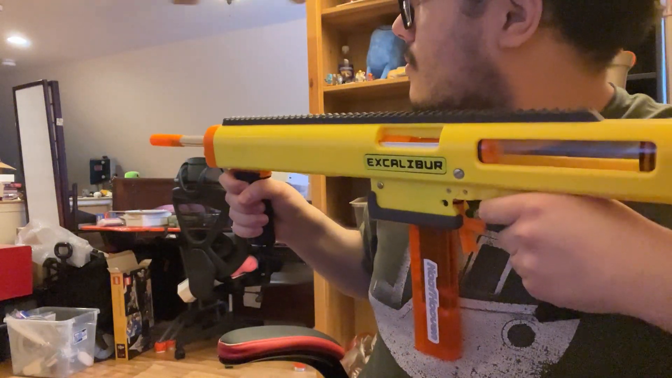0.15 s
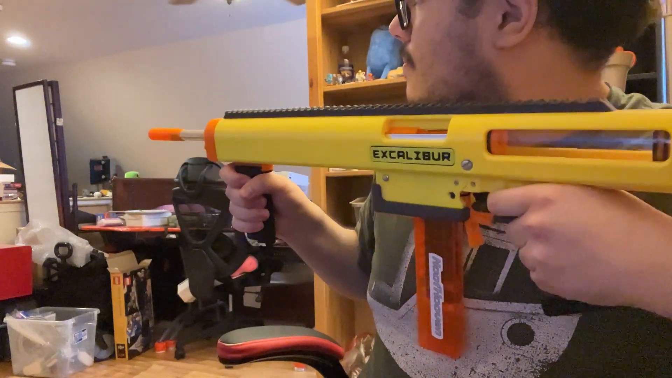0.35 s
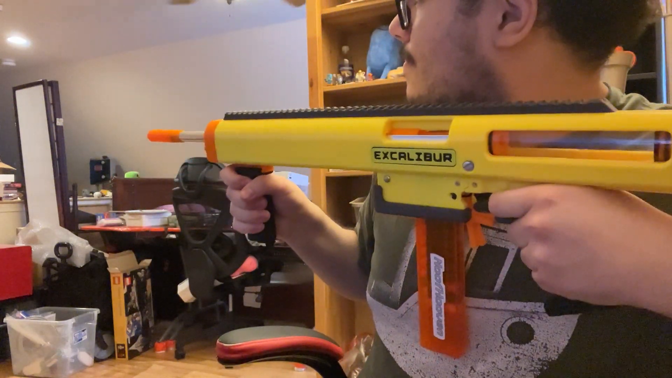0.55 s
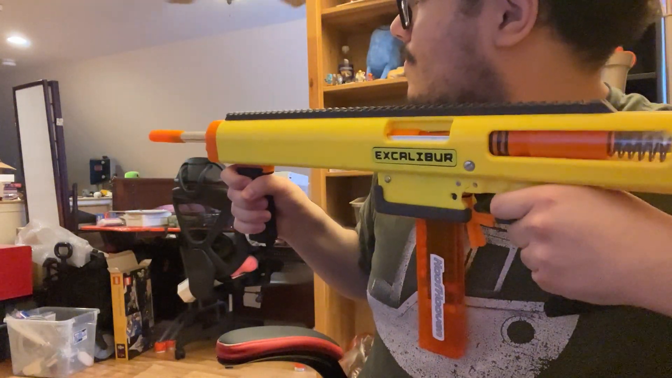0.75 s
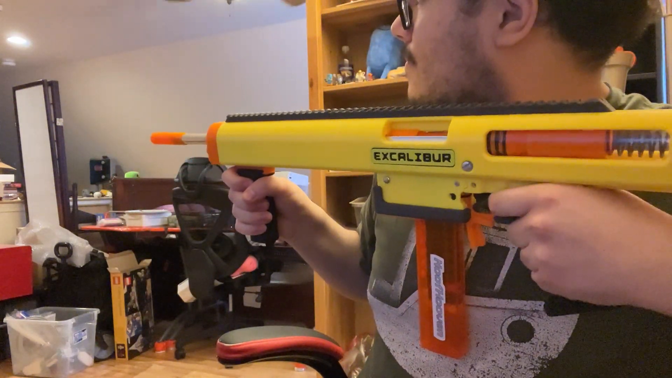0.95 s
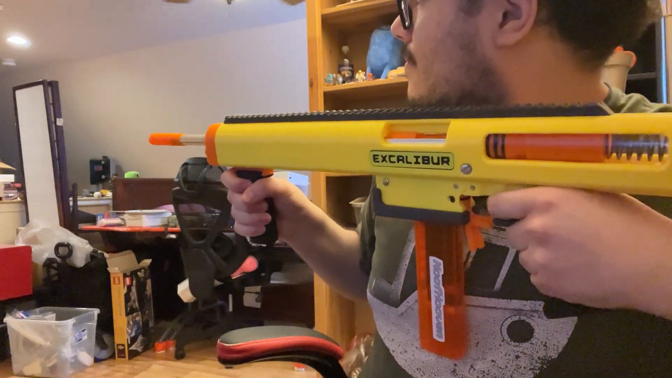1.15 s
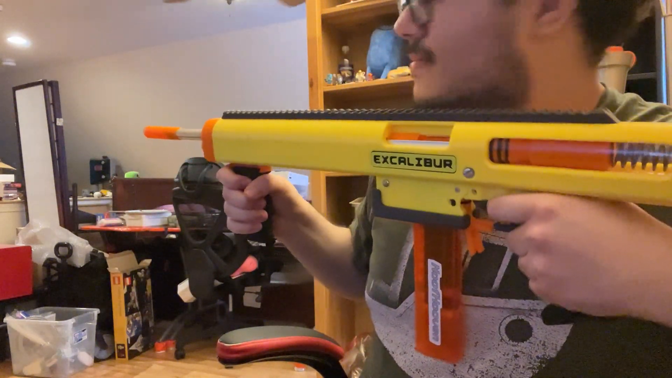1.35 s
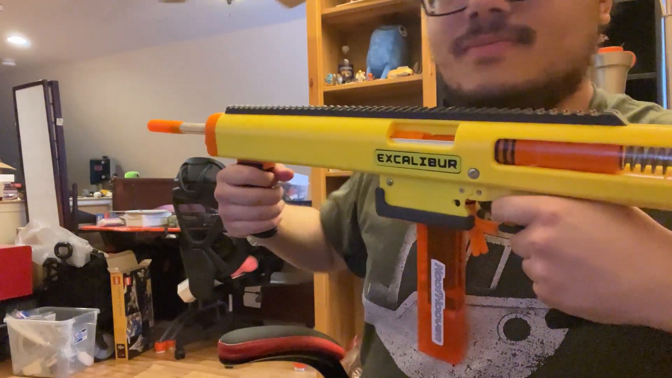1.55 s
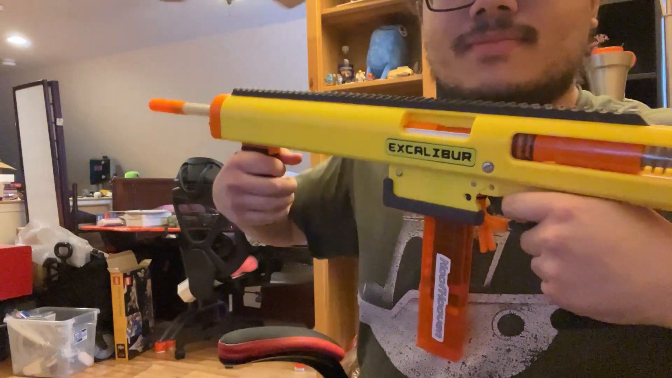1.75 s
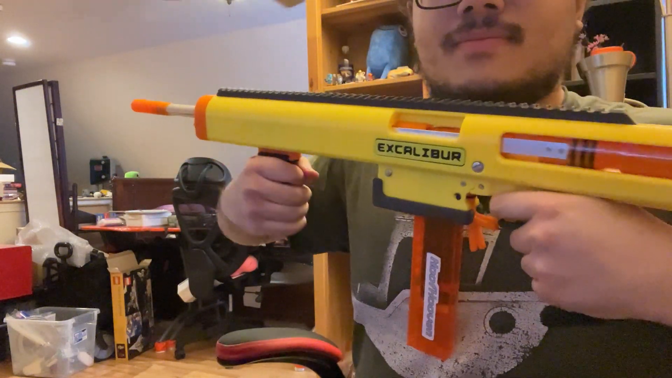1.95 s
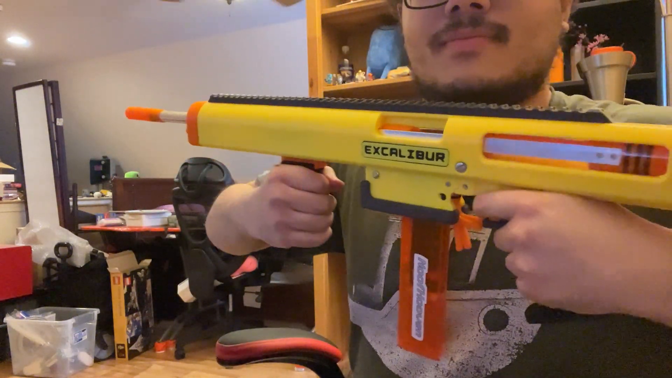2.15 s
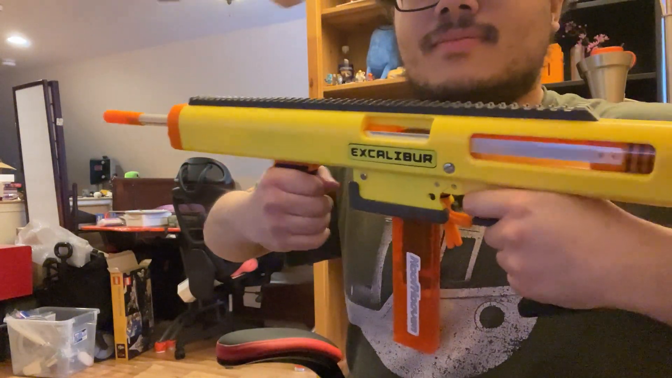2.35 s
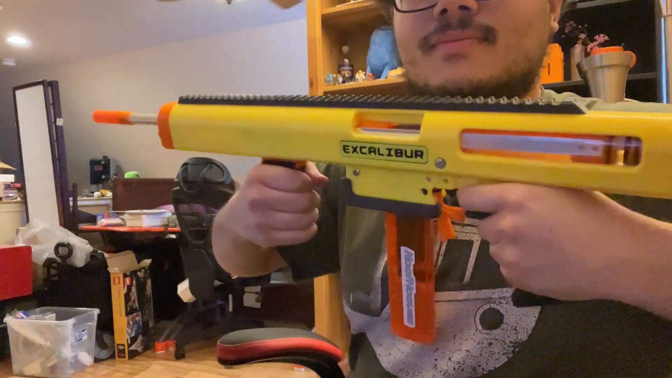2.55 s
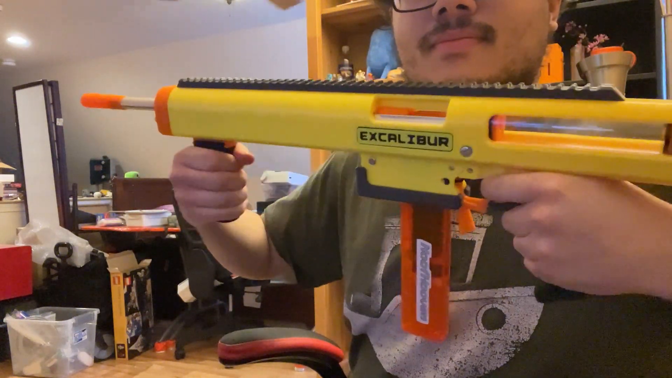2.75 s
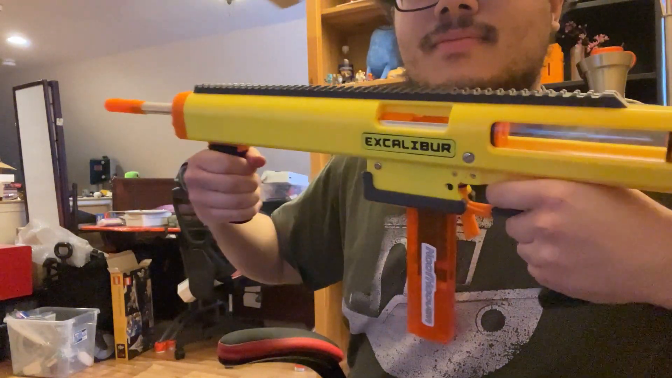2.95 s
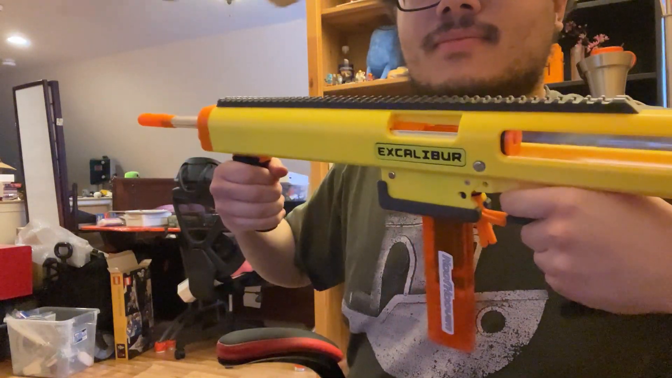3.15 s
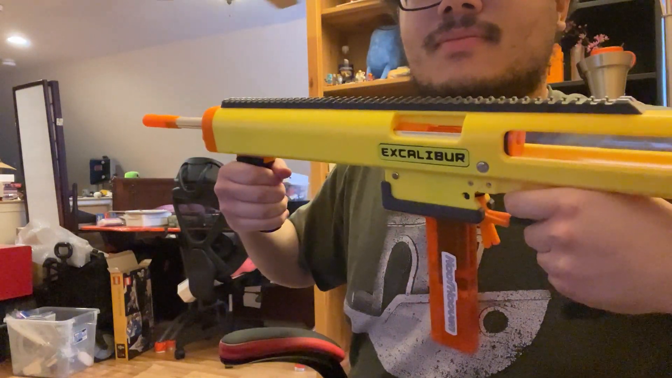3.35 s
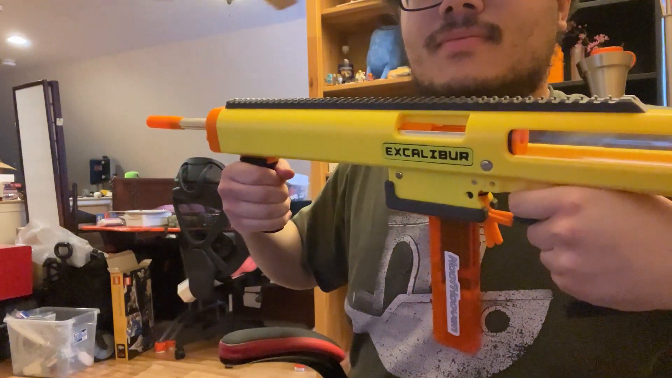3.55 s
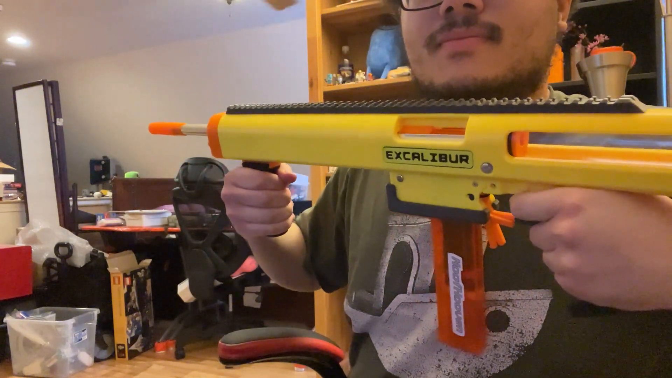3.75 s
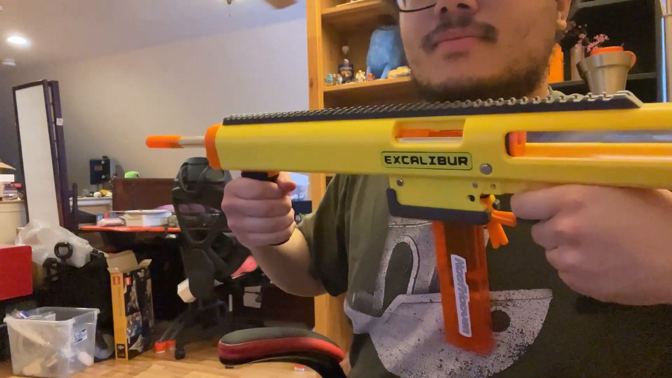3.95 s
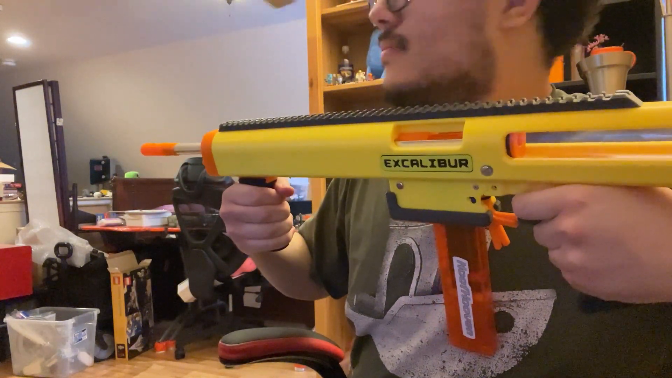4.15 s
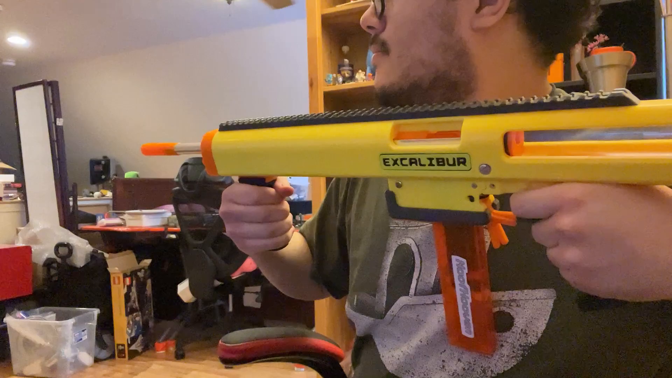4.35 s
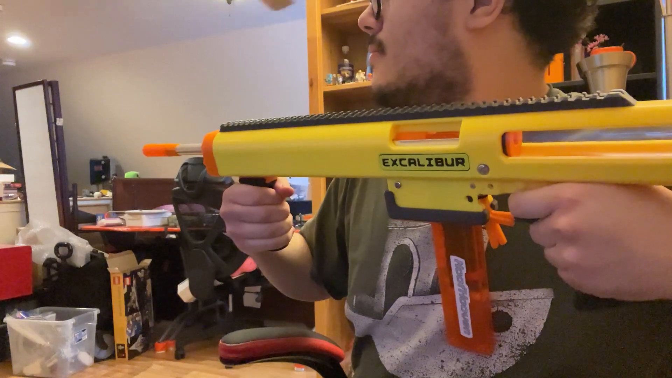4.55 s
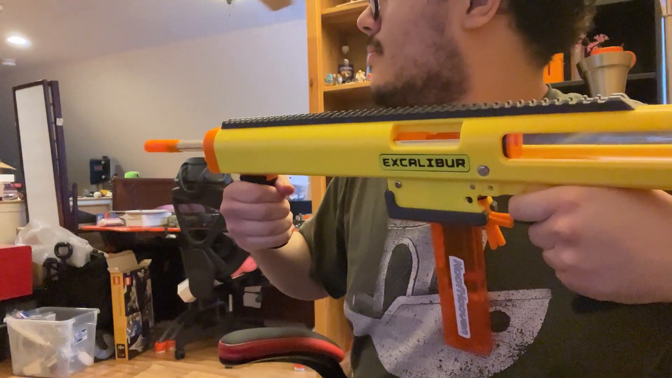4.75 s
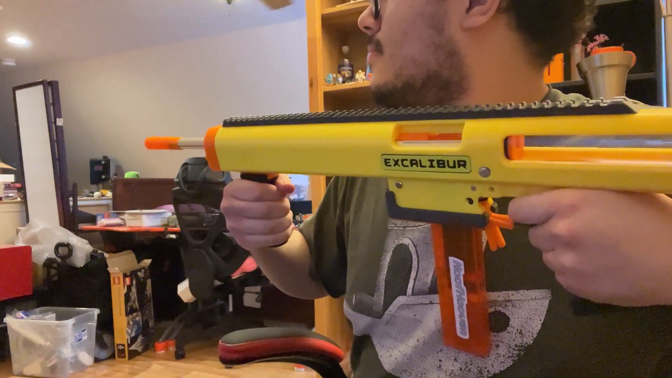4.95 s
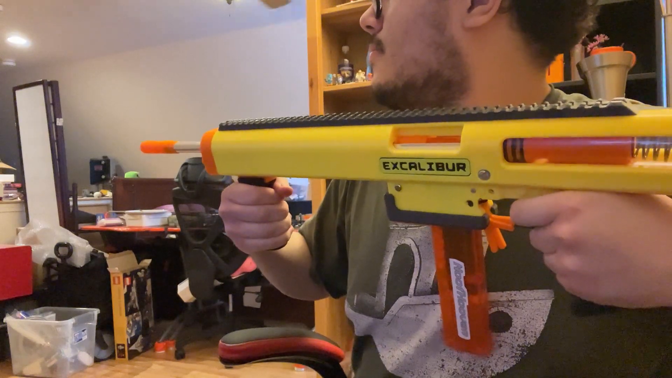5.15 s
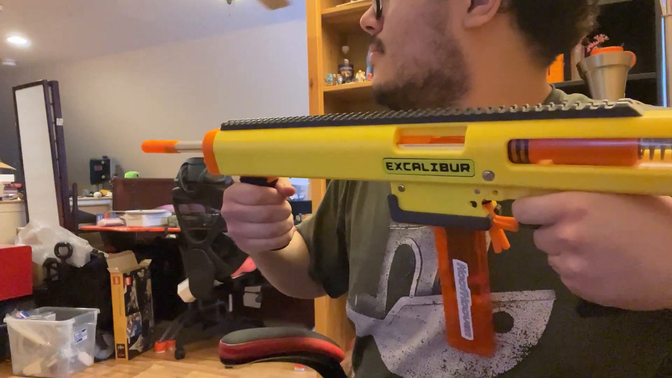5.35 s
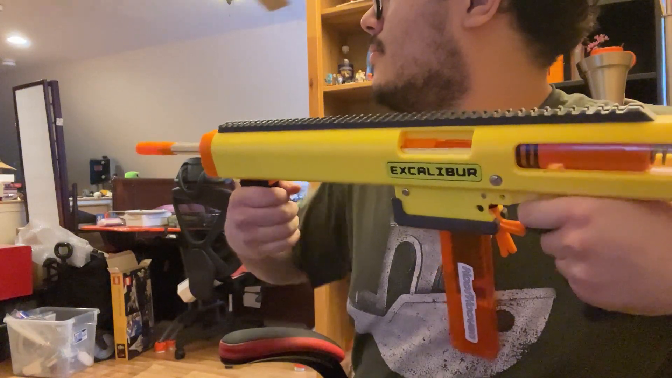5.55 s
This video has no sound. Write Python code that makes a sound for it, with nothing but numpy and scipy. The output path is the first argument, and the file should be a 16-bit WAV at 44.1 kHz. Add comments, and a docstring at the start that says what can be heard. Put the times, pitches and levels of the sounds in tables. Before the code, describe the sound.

A faint fan-like appliance hum fills a small, cluttered room throughout, with occasional deep handling rumble. Close by, a plastic blaster's trigger clicks at about 0.55 s; at 0.65 s the plunger slides and slams home in a loud, hollow double clack with a low air pop. Shell and spring ring thinly. At 0.88 s the dart smacks a far wall with plenty of room sound. Around 1.4 s a spent dart patters softly on the floor. From 1.75 s the pump knocks, then rattles and scrapes loudly at 2.05-2.25 s, reaching a softer stop at 2.38 s. A hissier forward slide at 2.63 s ends in a sharp clack at 2.78 s with a faint twang. Mostly hum remains until a small click at 4.65 s. The second shot cracks at 4.99 s, its dart hits the wall at 5.23 s, and pump knocks and scraping begin again at 5.55-5.7 s.

```python
"""An appliance hums in a cluttered room while a plastic pump-action foam-dart blaster is fired, pumped and
fired again, close by. Catch, plunger and pump are noise bursts ringing the modes of its hollow shell; the pump's
scrape is dense noise through the same shell and an air column. Trapped air pops, spring and shell ring on as
decaying sines, darts slap a far wall and one tumbles on the floor. Low rumble swells at times.
Two microphone ports differ in phase, band by band."""
import sys
import numpy as np
from scipy import signal
from scipy.fft import rfft, irfft, next_fast_len
from scipy.io import wavfile
from scipy.ndimage import uniform_filter1d, map_coordinates

SR = 44100
rng = np.random.default_rng(int(sys.argv[2]) if len(sys.argv) > 2 else 0)


def to_wav(s):
    """Save 16-bit WAV."""
    ch = np.atleast_2d(s).T  # columns
    pcm = np.round(np.clip(ch, -1, 1) * 32767)  # PCM
    wavfile.write(sys.argv[1], SR, pcm.astype(np.int16))


N = 251370

# modes of the blaster's shell and tubes: f/Hz, width/Hz, relative level/dB
SHELL = [(45, 120, 5.5), (83.4, 36, 9), (174, 45, 14.5), (331, 130, 15), (489, 110, 1), (607, 94, 12),
         (725, 56, 15), (970, 170, 7.5), (1363, 550, 14), (2250, 870, 6), (2460, 280, 0), (3040, 660, -1.5),
         (3885, 700, -1), (4700, 300, -27.5), (6350, 350, -3.5), (6670, 1500, 1), (8300, 5100, 5.5),
         (9700, 9000, 0.5), (12700, 3500, -4), (14940, 5700, -22)]
# modes of wall panel and floor boards: f/Hz, width/Hz, relative level/dB
PANEL = [(175, 38, -12), (322.1, 21, 17.5), (425, 110, 8.5), (625, 220, 3), (1128, 980, 12),
         (1560, 1300, 7), (2194, 380, 5), (3443, 1000, 3.5), (7000, 3616, 0), (9920, 2500, 5),
         (14500, 3000, -1)]
# Blow tables: t/s, drive/dB, weight/dB, t60/s; weight shifts a blow from the high modes to the low ones.
# Band drives: boom/dB, knock/dB, tube/dB, body/dB, click/dB, crack/dB.
BLASTER_RISE_S, BLASTER_WET_DB = .0015, -9.0


def amp(db):
    """dB to gain."""
    return 10 ** (np.asarray(db) / 20)


def unit(x):
    """x at rms 1."""
    return x / np.sqrt(np.mean(x ** 2) + 1e-20)


def along(points, hz):
    """Interpolates (Hz, value) points on a log-frequency axis."""
    f, v = np.transpose(points)
    return np.interp(np.log(hz + 1), np.log(f + 1), v)


def filtered(x, response):
    """x times a complex response of frequency."""
    m = next_fast_len(x.shape[-1] + 8192)
    spectrum = rfft(x, m) * response(np.fft.rfftfreq(m, 1 / SR))
    return irfft(spectrum, m)[..., :x.shape[-1]]


def wander(count, position):
    """Smooth random curve through count unit-variance normal draws, read at position."""
    return map_coordinates(rng.standard_normal(count), [position])


def through(x, modes, bands_db, scatter_db):
    """Rows of x ring the modes; drive follows each mode's band, with random unevenness from mode to mode."""
    # band centres: f/Hz
    bands_hz = [180, 420, 1050, 2300, 4600, 9500]
    hz, width, db = np.transpose(modes)[:, :, None]
    uneven_db = scatter_db * rng.standard_normal(hz.shape)
    drive = amp(db + along(list(zip(bands_hz, bands_db)), hz) + uneven_db)
    m = next_fast_len(x.shape[1] + 512)
    f = np.fft.rfftfreq(m, 1 / SR)
    mode_power = (drive * f * width) ** 2 / ((hz * hz - f * f) ** 2 + (f * width) ** 2)
    power = np.sum(mode_power, axis=0)
    # minimum phase by folded cepstrum: ringing starts at the blow, not before
    cepstrum = irfft(np.log(power + 1e-12) / 2, m)
    cepstrum[1:m // 2] *= 2
    cepstrum[m // 2 + 1:] = 0
    return irfft(rfft(x, m) * np.exp(rfft(cepstrum)), m)[:, :x.shape[1]]


def add(out, s, direct, toward_walls, wet_db):
    """Adds a sound at s seconds with the room's answer: noise in which each frequency has its own decay."""
    # room decay: f/Hz, t60/s
    room = [(100, 0.04), (500, 0.32), (2000, 0.41), (6000, 0.35), (14000, 0.24)]
    hz, t, z = signal.stft(rng.standard_normal((2, 16000)), SR, nperseg=256)
    decay = amp(-60 * t / along(room, hz)[:, None])
    tail = signal.istft(z * decay, SR, nperseg=256)[1]
    tail = np.pad(tail / np.linalg.norm(tail[0]), ((0, 0), (130, 0)))  # nearest wall answers 3 ms late
    heard = amp(wet_db) * signal.fftconvolve(toward_walls[None], tail, axes=1)
    heard[:, :direct.shape[-1]] += direct
    part = out[:, round(s * SR):][:, :heard.shape[1]]
    part += heard[:, :part.shape[1]]


def appliance():
    """Fan noise in faint time-frequency patches, and mains tones wavering in level and phase."""
    # mains tones: f/Hz, relative level/dB
    hum = [(118.4, -67.5), (360.7, -56.5)]
    # fan spectrum: f/Hz, relative density/dB per Hz
    fan = [(20, -57.5), (45, -22.5), (88, -7.5), (170, -21.5), (256, -15.5), (363, -11.5), (430, -15.5),
           (560, -17), (730, -11.5), (1000, -22), (1400, -32), (2500, -43.5), (6500, -58), (10500, -55.5),
           (16000, -74.5)]
    # course of air and tones together: t/s, relative level/dB
    course = [(0, -54.5), (1.3, -53.5), (2.5, -56.5), (3.2, -57.5), (4.0, -56), (5.7, -54.5)]
    t = np.arange(N) / SR
    z = signal.stft(rng.standard_normal((2, N)), nperseg=512)[2]
    patches = uniform_filter1d(rng.standard_normal(z.shape[1:]), 4, axis=0)
    patches = uniform_filter1d(patches, 12, axis=1)
    air = signal.istft(z * amp(1.1 * unit(patches)), nperseg=512)[1][:, :N]
    air = unit(filtered(air, lambda hz: amp(along(fan, hz))))
    tones = np.zeros(N)
    for hz, db in hum:
        level = amp(db + 0.83 * wander(int(N * 10 / SR) + 4, t * 10))
        phase = 2 * np.pi * hz * t + .3 * wander(int(N * 14 / SR) + 4, t * 14)
        tones += np.sqrt(2) * level * np.sin(phase)
    level_db = np.interp(t, *np.transpose(course))
    return amp(level_db) * (amp(4.5) * air + amp(57.5) * tones)


def rumble():
    """Noise mostly below 60 Hz, alike at both ports: a wandering floor plus swells when something is jolted."""
    # swells: top t/s, level/dB
    swells = [(.675, -42.5), (.95, -51.5), (2.2, -66.5), (2.79, -64.5), (5.0, -50.5), (5.33, -49.5),
              (5.7, -64)]
    calm_db, wander_db = -81, 6
    rise_60db_s, fall_60db_s = .12, .4
    t = np.arange(N) / SR
    spectrum = [(12, -31), (25, -1), (50, -0.5), (80, -24), (300, -84)]  # f/Hz, relative level/dB
    deep = unit(filtered(rng.standard_normal(N), lambda hz: amp(along(spectrum, hz))))
    level = amp(calm_db + wander_db * wander(40, t * 5))
    for s, db in swells:
        level += amp(db - 60 * np.maximum((t - s) / fall_60db_s, (s - t) / rise_60db_s))
    return level * deep


def blows(table, drive_db, rise_s, modes, wet_db):
    """Each blow is a short chatter of contacts that swells, dies and rings the modes."""
    # band gain per dB of weight, boom to crack: share/(dB/dB)
    weight_share = [.6, 1.2, 0.24, .4, -0.25, -0.25]
    out, t = np.zeros((2, N)), np.arange(3500) / SR
    for s, db, weight_db, t60 in table:
        shape = amp(db - 60 * t / t60) * (1 - np.exp(-t / rise_s)) ** 2
        chatter = shape * rng.standard_normal((2, len(t)))
        # the room gathers all directions: one impulse of equal energy gives it even colour
        whole = np.linalg.norm(shape) * (np.arange(len(t)) == np.argmax(shape))
        bands_db = drive_db + weight_db * np.array(weight_share)
        rung = through(np.vstack([chatter, whole]), modes, bands_db, scatter_db=2.5)
        add(out, s, rung[:2], rung[2], wet_db)
    return out


def trigger():
    """Trigger and catch click: slow-rising blows on the shell."""
    # blow table
    clicks = [(.534, -24.5, 4, .04), (.6165, -7, -8, 0.046), (4.645, -29, 5.5, .05),
              (4.6515, -16.5, 0.5, .04), (4.823, -48, -1.5, 0.032)]
    # band drives
    drive_db = [-25.5, -6, 14.5, -7.5, -5.5, -36]
    return blows(clicks, drive_db, .0025, SHELL, BLASTER_WET_DB)


def slides(strokes):
    """Sliding plastic: dense slips of uneven size; heavier strokes drive low and body modes more, hiss less."""
    # air column of the plunger tube: f/Hz, width/Hz, relative level/dB
    tube_mode = [(1125, 190, 0)]
    hiss_share, body_share = -.4, .42  # dB per dB of weight
    flat_db = np.zeros(6)
    out = np.zeros((2, N))
    for rows in strokes:
        s, db, weight_db, tube_db = np.transpose(rows)
        t = np.arange(s[0], s[-1], 1 / SR)
        edge = np.clip(np.minimum(t - s[0], s[-1] - t + 0.0011) / 0.0095, 0, 1)
        size = amp(3 * wander(len(t) // 64 + 4, np.arange(len(t)) / 64))
        slips = edge * amp(np.interp(t, s, db)) * unit(size * rng.standard_normal((2, len(t))))

        def ring(level_db, modes):
            driven = slips * amp(np.interp(t, s, level_db))
            return through(driven, modes, flat_db, scatter_db=0.64)

        sound = ring(weight_db + 12, SHELL[4:7])  # low
        sound += ring(body_share * weight_db + 7.5, SHELL[8:11])  # body
        sound += ring(np.full(len(s), 14.5), SHELL[11:15])  # 3-6.4 kHz, whatever the weight
        sound += ring(hiss_share * weight_db - 5, SHELL[15:])  # hiss
        column = through(slips * amp(np.interp(t, s, tube_db)), tube_mode, flat_db, scatter_db=0)
        sound += through(column, tube_mode, flat_db, scatter_db=0)  # heard through its mouth
        add(out, s[0], sound, sound[0], wet_db=-5.5)
    return out


def flights():
    """The plunger's flight at each shot: a slide that swells, holds, and dies heavier once it is home."""
    # shots: start t/s, drive/dB
    shots = [(.625, -20.5), (4.972, -20)]
    rise_s, hold_s, fall_s = .02, 0.013, .05
    rise_db, fall_db = 22, 12.5
    light_db, heavy_db, tube_db = -10.5, 3, 17.5  # weight in flight, weight at the end, air column
    strokes = []
    for s, db in shots:
        top = s + rise_s
        home = top + hold_s
        strokes.append([(s, db - rise_db, light_db, tube_db), (top, db, light_db, tube_db),
                        (home, db, light_db, tube_db), (home + fall_s, db - fall_db, heavy_db, tube_db)])
    return slides(strokes)


def plunger():
    """The released plunger slams home and bounces inside the shell."""
    # blow table
    slams = [(.6459, 9.5, -8.5, .033), (.6524, 9.5, -8.5, .03), (.6664, -1, 14, .049),
             (.6804, -2.5, 6.5, .063), (4.9865, 8, -8, .025), (5.0044, 4, 2, .057),
             (5.0104, -3.5, 7, 0.077), (5.0224, -2.5, -3, .03), (5.0338, 1.5, -7.5, .03)]
    # band drives
    drive_db = [-12, -7, -14, -4, 1, -11.5]
    return blows(slams, drive_db, BLASTER_RISE_S, SHELL, BLASTER_WET_DB)


def pops():
    """Plunger or pump stops dead and trapped air leaves in one low push and rebound."""
    # pushes: t/s, level/dB, time constant/s
    pushes = [(0.65, -24, .0015), (0.669, -11.5, .0008), (0.679, -19, .0007), (2.782, -31.5, 0.0018),
              (5.008, -13, 0.0015)]
    out, t = np.zeros((2, N)), np.arange(2000) / SR
    for s, db, length_s in pushes:
        u = t / length_s
        push = amp(db) * u * (2 - u) * np.exp(-u)
        add(out, s, push, push, wet_db=-7)
    return out


def spring():
    """Thin spring tones and low shell tones ring on after a jolt as decaying sines, until a hand damps them."""
    # tones: t/s, f/Hz, level/dB, t60/s
    twangs = [(.668, 1588, -49, 6), (.668, 1240, -47, 1.6), (2.779, 1485, -51, 1.1),
              (2.383, 1485, -52, 1.2), (2.383, 2510, -58, 1.2), (2.383, 3900, -58, 1.2),
              (.669, 175, -31, .55), (5.012, 171, -29, .4)]
    out, t = np.zeros((2, N)), np.arange(round(.74 * SR)) / SR
    damping = np.clip((t[-1] - t) / .03, 0, 1)
    for s, hz, db, t60 in twangs:
        ring = amp(db - 60 * t / t60) * damping * np.sin(2 * np.pi * hz * t)
        add(out, s, ring, ring, wet_db=-3)
    return out


def darts():
    """Darts slap the far wall: sharp blows on the panel, as much room as direct sound."""
    # blow table
    slaps = [(.8743, 1.5, -2.5, .026), (.885, -3, 5, .026), (5.231, -2.5, 0.5, .03),
             (5.2415, -2.5, 3.5, .04)]
    # band drives
    drive_db = [-9, -8, -10, -4, 0, -11.5]
    return blows(slaps, drive_db, .0008, PANEL, wet_db=0.0)


def falling_dart():
    """A spent dart tumbles on the floor: a run of soft blows on the boards."""
    # blow table
    falls = [(1.383, -37.5, -15.5, 0.11), (1.4384, -22, 0, 0.046), (1.452, -27.5, 8.5, .05),
             (1.4605, -26.5, 4.5, .03), (1.476, -30, -1.5, .05)]
    # band drives
    drive_db = [-22, 14, -3.5, 6.5, -6, -17.5]
    return blows(falls, drive_db, .0012, PANEL, wet_db=-2)


def pump_knocks():
    """The pump catches on its rail and parts, knocking the shell."""
    # blow table
    knocks = [(1.6586, -37.5, 1.5, .03), (1.7639, -35, 7.5, .023), (1.7858, -28, 8.5, .023),
              (1.8045, -7, -9.5, .02), (1.8197, -6.5, -9.5, .053), (1.8253, -7, 1, .048),
              (1.8736, -12.5, -1, 0.11), (1.9041, -7.5, -4, .049), (1.9395, -9.5, 3, .03),
              (1.9624, -26, -3, .021), (2.0497, 5, -7, .03), (2.0767, 4, -5, 0.044),
              (2.1036, 9.5, -4, .023), (2.1555, 2, -11.5, .045), (2.1839, 1, -3.5, .047),
              (2.2076, 3, 0, .03), (2.2205, 7.5, -15, 0.026), (2.613, -31.5, 10, .019),
              (2.631, -19, -9, 0.042), (5.5383, -19.5, 10.5, .023), (5.5932, -30, 8, .03),
              (5.6104, -18, -2, 0.023), (5.6204, -11, -2, .03), (5.6271, -6.5, -2, .03),
              (5.658, -20, 19.5, .08), (5.6864, 0, 2.5, 0.022)]
    # band drives
    drive_db = [-32, -7.5, -14, -8.5, 1.5, -11]
    return blows(knocks, drive_db, BLASTER_RISE_S, SHELL, BLASTER_WET_DB)


def pump_scrapes():
    """The pump slides along its rail: back, forward and back again."""
    # one list a stroke: t/s, scrape drive/dB, weight/dB, air column over scrape/dB
    strokes = [
        [(1.77, -60.5, 10.5, 27.5), (1.81, -44, -4, 19.5), (1.9, -48, 3, 32), (1.99, -49.5, 12, 33),
         (2.012, -54, 10, 54.5), (2.032, -48, 3.5, 45), (2.042, -42, 7, 50), (2.052, -33.5, 2, 34),
         (2.07, -29, 2.5, 30.5), (2.12, -32, 4.5, 26.5), (2.2, -35.5, 2, 16), (2.25, -38, 3.5, 34),
         (2.29, -84.5, -4.5, 16.5)],
        [(2.5, -69, -6, 27), (2.6, -71, 4, 26), (2.64, -41.5, -11.5, 11), (2.685, -39.5, -20, 11),
         (2.705, -36.5, -27.5, 19.5), (2.76, -33.5, -12.5, 21), (2.78, -35, 3, 29)],
        [(5.585, -55, 2, 35.5), (5.61, -43.5, -24, 25), (5.63, -36.5, -14, 25), (5.66, -38, 8, 17.5),
         (5.7, -37.5, 0, 31.5)],
    ]
    return slides(strokes)


def end_stops():
    """The pump reaches its end stops and rebounds: sharp blows on the shell."""
    # blow table
    stops = [(2.3612, -24.5, 6, .03), (2.3825, -16, -5, .06), (2.770, -14, -1, .04), (2.7772, 1.5, 1, .025),
             (2.8005, -22, 0.5, 0.036)]
    # band drives
    drive_db = [-27, -9, -2, 3, -2, -8.5]
    return blows(stops, drive_db, .0008, SHELL, wet_db=-11)


def scene():
    """Blaster near, darts far and mixed with more room, hum all round."""
    blaster = trigger() + flights() + plunger() + pops() + spring()
    pump = pump_knocks() + pump_scrapes() + end_stops()
    return appliance() + rumble() + blaster + darts() + falling_dart() + pump


def record(dry):
    """Ports share the lows, differ widely from 1 to 5 kHz, with a phase offset that turns with frequency.

    Then gain control, soft top and band limit."""
    # ports' difference against their sum: f/Hz, level/dB
    narrow = [(30, -15), (90, -9), (400, -8), (750, -5), (1100, -2), (5400, -2), (6500, -6), (7300, -7),
              (8300, -18), (9600, -8), (10700, -18), (12100, -8), (13400, -20), (14800, -6), (15500, -10)]
    # phase by which left leads: f/Hz, lead/rad
    lead_table = [(0, 0), (350, -.7), (650, -2.3), (1600, -3), (2400, -5.5), (3400, -9), (4700, -13.4),
                  (6550, -11.3), (8200, -9.42), (8700, -9.1), (10700, -6.3), (11400, -6.1), (12800, -3.5),
                  (14100, -2.8), (15500, -.2)]
    top_hz = 16900
    common = dry.mean(axis=0)
    apart = filtered((dry[0] - dry[1]) / 2, lambda hz: amp(along(narrow, hz)))
    lead_hz, lead_rad = np.transpose(lead_table)

    def turn(hz):
        return np.exp(.5j * np.outer([1, -1], np.interp(hz, lead_hz, lead_rad)))

    ports = filtered(np.array([common + apart, common - apart]), turn)
    keep = np.exp(-1 / (.06 * SR))  # level meter, 60 ms memory
    power = signal.lfilter([1 - keep], [1, -keep], np.mean(ports ** 2, axis=0))
    level_db = 10 * np.log10(power + 1e-12)
    ports = ports * amp(-.15 * np.maximum(level_db + 35.0, 0))  # .15 dB less gain per dB above -35 dB
    ports = ports / (1 + np.abs(ports / .97) ** 6) ** (1 / 6)
    band = [(15, -23.5), (36, 0), (15700, -4.0), (16000, -26.0), (16800, -28.0)]  # f/Hz, gain/dB
    return filtered(ports, lambda hz: amp(along(band, hz)) * (hz < top_hz))


dry = scene()
out = record(dry)
to_wav(out)
```